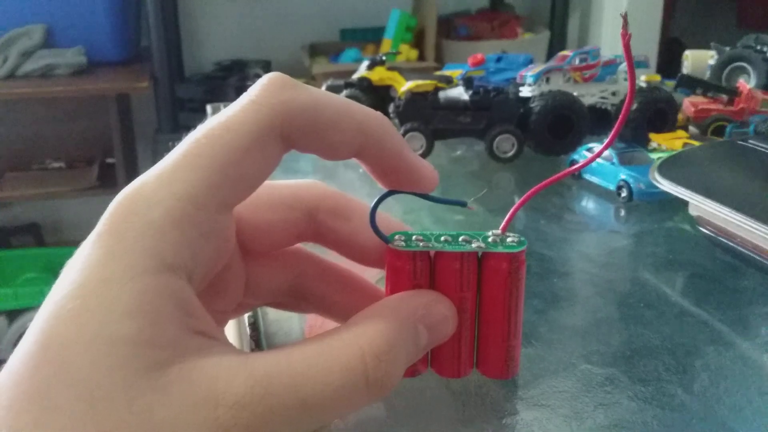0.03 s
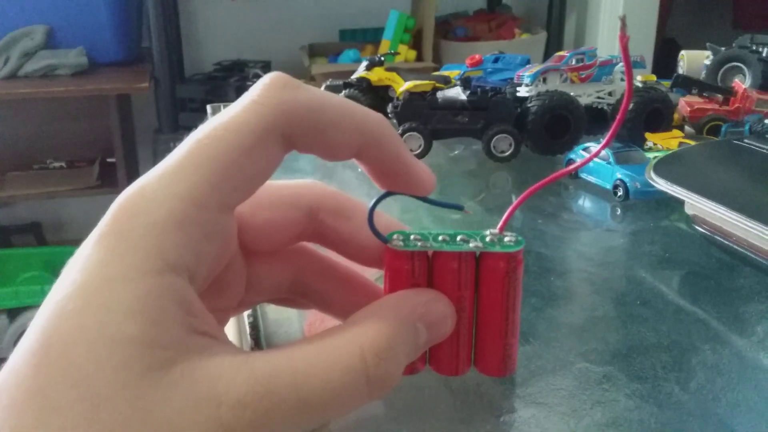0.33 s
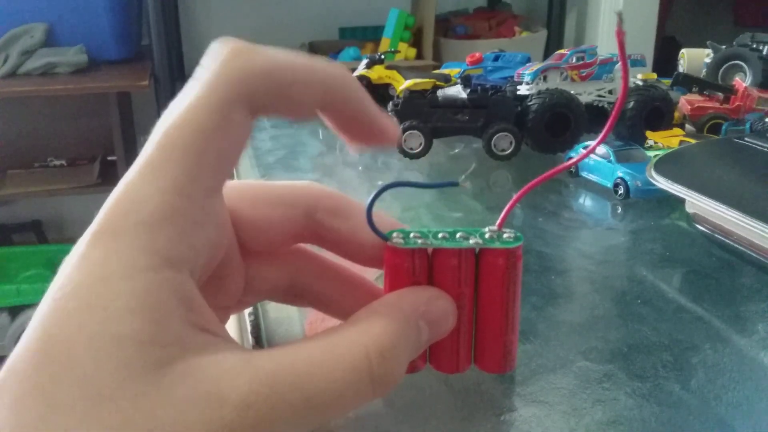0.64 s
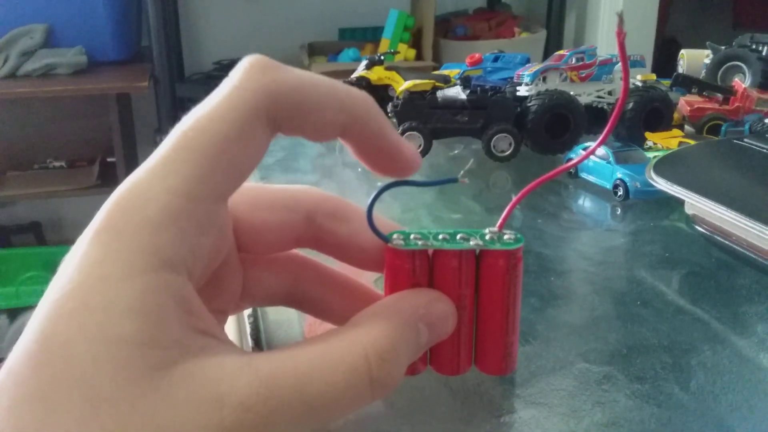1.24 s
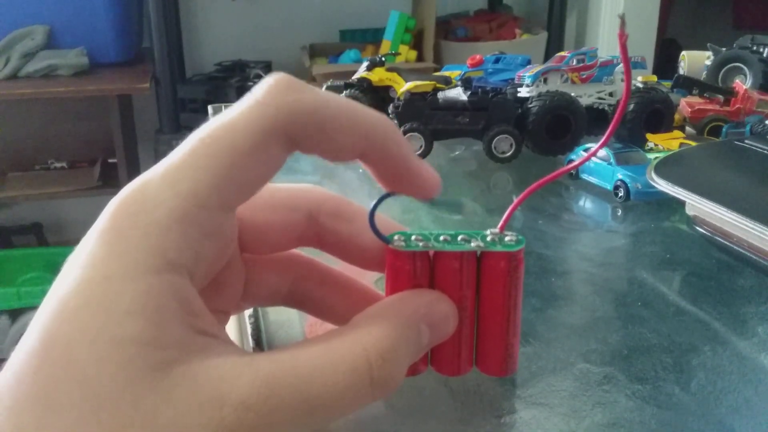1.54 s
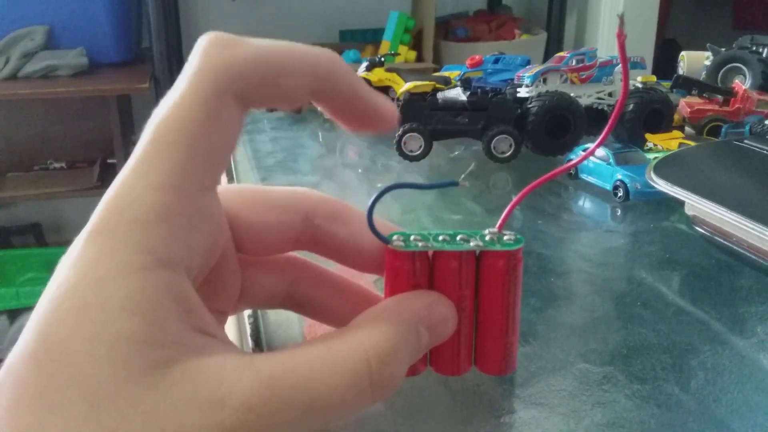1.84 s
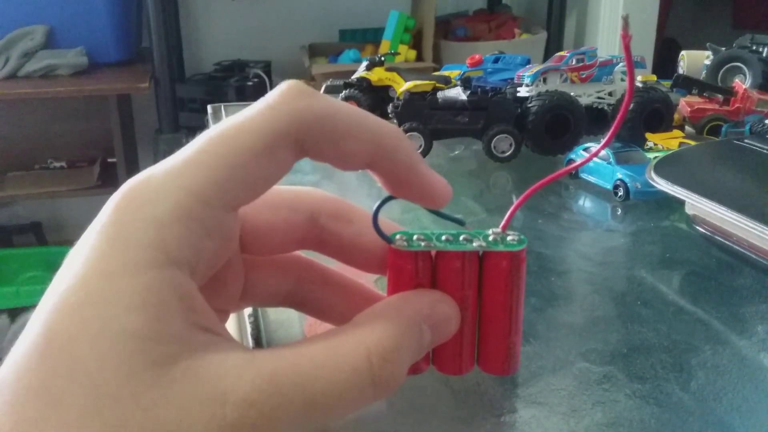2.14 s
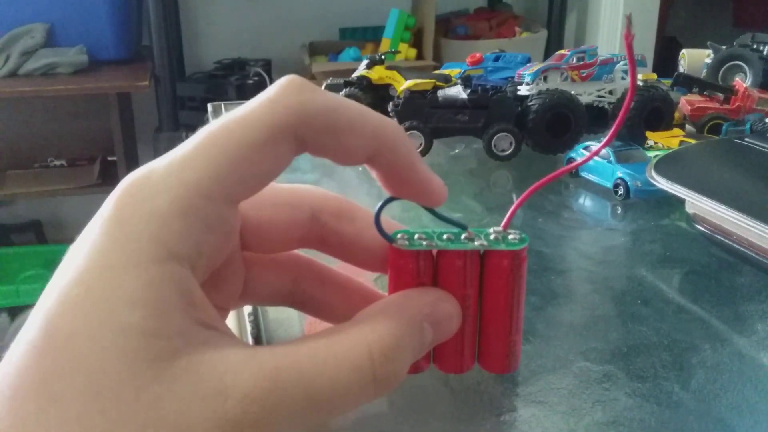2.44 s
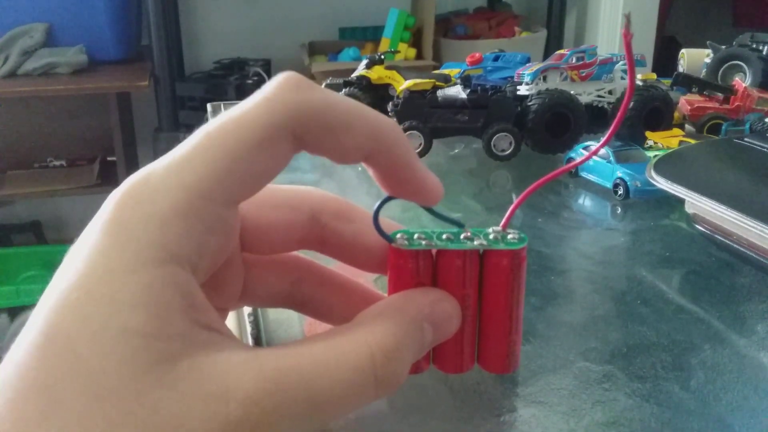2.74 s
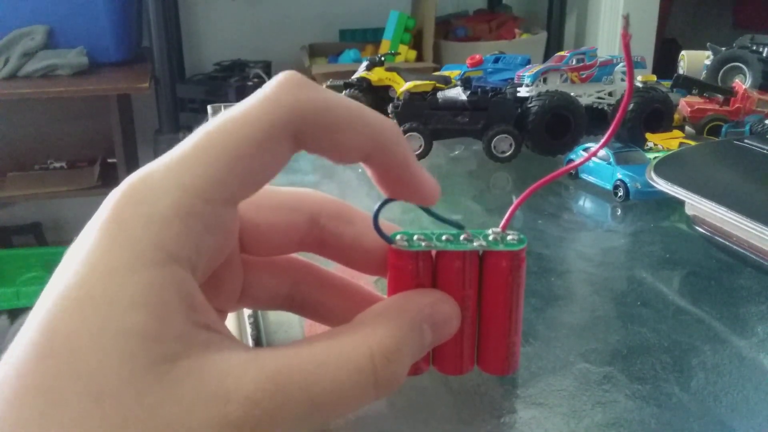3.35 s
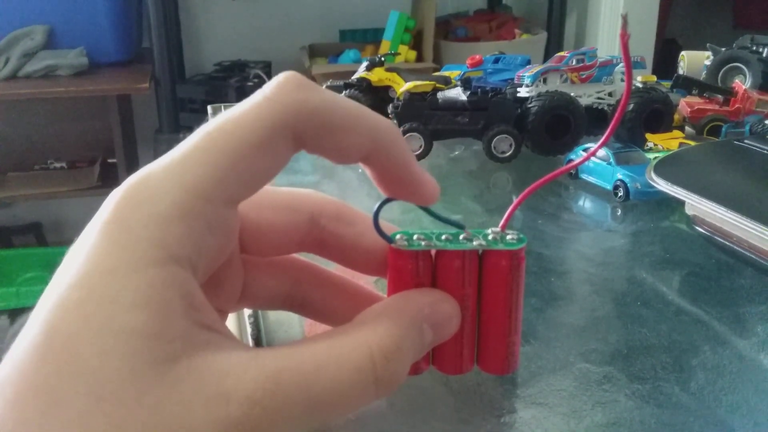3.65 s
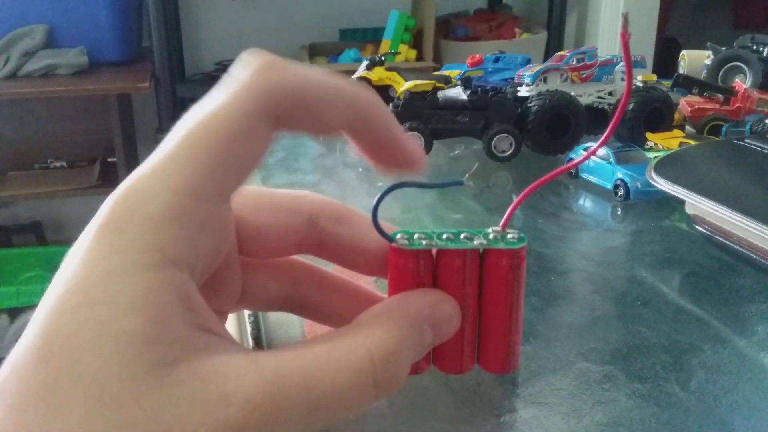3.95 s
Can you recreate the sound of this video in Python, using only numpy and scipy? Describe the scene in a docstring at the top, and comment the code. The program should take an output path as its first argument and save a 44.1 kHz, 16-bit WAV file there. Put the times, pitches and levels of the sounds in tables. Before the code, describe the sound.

Tiny electric sparks click in pairs from a tapped wire while a fan hums indoors.

```python
"""A fan runs in a small room: rushing air, wavering tones and motor hum over faint microphone hiss.
From 0.5 s a wire is tapped seven times on the contacts of a battery pack. Each tap throws two tiny
sparks, one as the wire touches and one as it lets go. Each spark is a pressure impulse, heard as a
bright snap, then its reflection off the table top, then the short hissing reverberation of the room.
After the first and second taps a finger slides off the wire with a soft brush of friction."""
import sys
import numpy as np
from scipy import signal
from scipy.fft import rfft, irfft
from scipy.io import wavfile

SR = 44100
rng = np.random.default_rng(int(sys.argv[2]) if len(sys.argv) > 2 else 0)


def transcribe(signal):
    """Save signal, clipped to [-1, 1], as a 16-bit WAV file at the path in sys.argv[1]."""
    frames = np.atleast_2d(signal).T
    limited = np.clip(frames, -1, 1)
    pcm = np.round(limited * 32767).astype(np.int16)
    wavfile.write(sys.argv[1], SR, pcm)


N = 176400


def from_db(db):
    """Amplitude ratio of a level: a factor of ten per 20 dB."""
    return 10 ** (np.asarray(db) / 20)


def at_hz(points, hz):
    """Interpolation of (f/Hz, value) points on a logarithmic frequency axis."""
    knots_hz, values = np.transpose(points)
    return np.interp(np.log(hz + 1e-3), np.log(knots_hz), values)


def noise(density):
    """Spectral shaping: white noise takes on density(f), an amplitude per root Hz."""
    hz = np.arange(N // 2 + 1) * SR / N
    return irfft(rfft(rng.standard_normal(N)) * density(hz) * np.sqrt(SR / 2), N)


def narrowband(centre_hz, width_hz):
    """Narrow-band noise of rms 1 beats into a wavering tone; centred on zero it is a slow drift."""
    x = noise(lambda hz: 1 / (1 + ((hz - centre_hz) / width_hz) ** 2))
    return x / x.std()


def add(out, x, start_s):
    """Superposition: x adds to out from start_s on."""
    i = int(np.clip(round(start_s * SR), 0, len(out) - 1))
    out[i:i + len(x)] += x[:len(out) - i]


def room_ripple_db(hz, depth_db=1.84, spacing_hz=14, corner_hz=3500):
    """Room resonances leave small peaks and dips in a steady spectrum, shallower in the treble."""
    knots = np.arange(0, SR / 2, spacing_hz)
    spread_db = depth_db / (1 + (hz / corner_hz) ** 2)
    return spread_db * np.interp(hz, knots, rng.standard_normal(len(knots)))


def fan(air_db=-76, top_hz=15800, hum_hz=120.2, hum_db=-64, flutter_hz=8):
    """Moving air gives broadband noise and wavering tones; the motor's periodic vibration gives a hum."""
    # Spectrum of the rush and the hiss floor: f/Hz, level/dB re air_db
    air_spectrum = [(20, -26.5), (35, -24), (55, -12.5), (75, -8), (95, -9.5), (145, -7), (200, -10),
                    (265, -14.5), (330, -12.5), (400, -6.5), (470, -11.5), (560, -12), (670, -9.5),
                    (750, -10.5), (830, -0.14), (920, -1.74), (980, -9), (1100, -14.5), (1220, -18),
                    (1400, -18.5), (1560, -28.5), (2000, -26.5), (2400, -33.5), (3200, -38), (5000, -43.5),
                    (8500, -46.5), (10500, -43.5), (15500, -43.5)]
    # Fan tones: f/Hz, half-width/Hz, rms level/dB before the drift
    fan_tones = [(93.3, 5.7, -67.5), (226, 6, -75.5), (301.8, 11.4, -64), (365.1, 7.3, -60.5),
                 (429.1, 10, -65.5), (500, 4.6, -70.5), (627.3, 8.3, -70), (712, 12, -78.5),
                 (782, 11, -66.5), (846.4, 10, -62.5), (907.4, 5, -61), (1018, 9.8, -71),
                 (1125, 3.2, -74.5), (1392, 10, -80), (1500, 6.9, -81), (1660, 6.9, -87.5),
                 (1816, 9.1, -83.5)]
    # Slow drift of rush and tones: t/s, level/dB
    drift = [(0, -2.5), (.35, -1), (.6, 1), (1.1, 0), (1.7, 0), (2.1, 0.36), (2.4, -1), (2.8, .5),
             (3.2, 0.9), (3.4, -1), (3.7, .5), (4, 1)]
    t = np.arange(N) / SR
    air = noise(lambda hz: from_db(air_db + at_hz(air_spectrum, hz) + room_ripple_db(hz)) * (hz < top_hz))
    tones = sum(from_db(db) * narrowband(hz, width) for hz, width, db in fan_tones)
    hum = from_db(hum_db) * np.sqrt(2) * np.sin(2 * np.pi * hum_hz * t)
    flutter_db = narrowband(0, flutter_hz)  # 1 dB rms
    level_db = np.interp(t, *np.transpose(drift)) + flutter_db
    return (air + tones) * from_db(level_db) + hum


def microphone_hiss(density_db=-123, low_hz=3120, top_hz=15800):
    """Treble self-noise, in antiphase between the two channels, sounds wide."""
    hiss = noise(lambda hz: from_db(density_db) * (hz < top_hz))
    highpass = signal.butter(4, low_hz, "high", fs=SR, output="sos")
    return signal.sosfilt(highpass, hiss) * [[1], [-1]]


def pulse(spectrum_db):
    """Minimum phase: folding the cepstrum gives the shortest causal pulse with this spectrum."""
    cepstrum = irfft(np.log(from_db(spectrum_db)))
    half = len(cepstrum) // 2
    cepstrum[1:half] *= 2
    cepstrum[half + 1:] = 0
    return irfft(np.exp(rfft(cepstrum)))


def ring(x, hz, t60):
    """A damped mode, driven by x, decays by 60 dB in t60 seconds."""
    r = from_db(-60 / (t60 * SR))
    w = 2 * np.pi * hz / SR
    return signal.lfilter([1, -r * np.cos(w)], [1, -2 * r * np.cos(w), r * r], x + 1e-18)


def sparks(body_width_hz=1070, top_hz=14500, top_width_hz=990, size=1024):
    """Each discharge radiates a pressure impulse of its own colour; some fire twice, all ring briefly."""
    # Sparks: t/s, level/dB, body f/Hz, body gain/dB, top gain/dB,
    # lead/ms of a smaller, inverted first discharge, its amplitude ratio
    discharges = [(0.485, -6.5, 6840, 4, -5, .13, 0.1), (0.5536, -14.5, 7000, -2, -4, 0, 0),
                  (1.6139, -10, 7600, -6, -2, .218, .85), (1.688, -15.5, 6640, 6, 6, 0, 0),
                  (2.425, -10, 7200, 4, 1, .62, 0.44), (2.5072, -21.5, 6800, 8, -10, 0, 0.05),
                  (2.7523, -2, 5950, -12.5, -1, 0, 0), (2.8438, -10, 6750, -17, 1, 0, 0),
                  (3.0422, -3.5, 6100, -12, 1, 0, 0.03), (3.1287, -20, 6800, -7, -2, 0, 0.02),
                  (3.3252, -10.5, 7400, 0.5, 3, 0.43, 0), (3.4053, -16.5, 7200, -8, 6, 0, 0),
                  (3.5494, -7, 7400, 1.5, 1, 0, 0.02), (3.6977, -15, 6800, 8.5, 4, 0.31, 0)]
    # Spectrum common to all snaps: f/Hz, level/dB
    snap_spectrum = [(200, -53), (2500, -30.5), (4800, -29.5), (6600, -19), (8500, -18), (9500, -16),
                     (10400, -1.5), (12000, -2), (13800, -2), (15200, -11), (16500, -18.5)]
    # Modes ringing after a snap: f/Hz, relative level/dB, T60/s
    modes = [(10400, -21.5, 0.0081), (11900, -23, .004), (13600, -32, .004)]
    snaps = np.zeros(N)
    hz = np.fft.rfftfreq(size, 1 / SR)
    top = np.exp(-.5 * ((hz - top_hz) / top_width_hz) ** 2)
    for time_s, db, body_hz, body_db, top_db, lead_ms, ratio in discharges:
        body = np.exp(-.5 * ((hz - body_hz) / body_width_hz) ** 2)
        snap = pulse(db + at_hz(snap_spectrum, hz) + body_db * body + top_db * top)
        lead_s = lead_ms / 1000
        delay = np.exp(-2j * np.pi * hz * lead_s)
        pair = irfft(rfft(snap) * (delay - ratio))
        add(snaps, pair[:size // 2], time_s - lead_s)
    return snaps + sum(from_db(db) * ring(snaps, mode_hz, t60) / 4 for mode_hz, db, t60 in modes)


def room(x, scatter_db=-15, scatter_t60_s=.012, tail_db=-11):
    """Convolution with an impulse response: direct sound, scatter off table clutter, echoes and tail."""
    # Reflections off the table, the hand and the nearest walls: delay t/ms, level/dB
    echoes = [(.4, -24), (1.25, -9.5), (1.7, -19), (7.4, -25.5), (18.1, -22)]
    response = from_db(tail_db) * reverberation()
    t = np.arange(len(response)) / SR
    scatter = rng.standard_normal(len(t)) * from_db(-60 * t / scatter_t60_s)
    response += from_db(scatter_db) * scatter / np.linalg.norm(scatter)
    response[0] += 1  # direct sound
    for ms, db in echoes:
        add(response, from_db([db]), ms / 1000)
    return signal.fftconvolve(x, response)[:N]


def reverberation(delay_s=.0051, build_s=.0058, bands=12):
    """A diffuse field builds up, then decays exponentially in each band, fastest in the top treble."""
    # Spectrum of the diffuse field: f/Hz, relative level/dB
    colour = [(3000, -4), (6500, -3), (8400, -1), (9400, 6.5), (10400, -2), (12000, -1.5), (15300, -4.5),
              (16300, -11)]
    # Reverberation time: f/Hz, T60/s
    decay_times = [(3000, 0.17), (8000, 0.18), (11000, .175), (15500, 0.14)]
    t = np.arange(SR // 2) / SR
    age = np.maximum(t - delay_s, 0)
    hz = np.fft.rfftfreq(len(t), 1 / SR)
    spectrum = rfft(rng.standard_normal(len(t))) * from_db(at_hz(colour, hz))
    centres_hz, step_hz = np.linspace(500, 17000, bands, retstep=True)
    tail = np.zeros(len(t))
    for centre in centres_hz:
        triangle = np.maximum(1 - abs(hz - centre) / step_hz, 0)
        band = irfft(spectrum * triangle, len(t))
        tail += band * from_db(-60 * age / at_hz(decay_times, centre))
    tail *= np.sqrt(1 - np.exp(-age / build_s))
    return tail / np.linalg.norm(tail)


def finger():
    """Sliding friction of skin on the wire's sleeve makes soft swells of noise."""
    # Gaussian swells: centre t/s, standard deviation/s, peak density level/dB
    rubs = [(.585, 0.0076, -110), (1.766, 0.029, -109)]
    # Friction spectrum: f/Hz, level/dB re the swell
    rub_spectrum = [(1000, -33), (2500, 5), (3500, 0), (5500, -17), (9000, -11), (10800, 7), (15000, -20)]
    t = np.arange(N) / SR
    swell = sum(from_db(db) * np.exp(-.5 * ((t - centre) / width) ** 2) for centre, width, db in rubs)
    return swell * noise(lambda hz: from_db(at_hz(rub_spectrum, hz)))


def scene():
    """Sound pressures add: the steady fan and hiss, the sparks in the room, the finger."""
    taps = room(sparks()) + finger()
    return fan() + microphone_hiss() + taps


def record(dry, start_s=.0614, fade_s=.0078, cutoff_hz=16300):
    """A linear ramp opens the sound after a moment of near silence; a low-pass filter cuts the top."""
    opening = np.clip((np.arange(N) / SR - start_s) / fade_s, from_db(-56), 1)
    lowpass = signal.ellip(10, .1, 70, cutoff_hz, fs=SR, output="sos")
    return signal.sosfilt(lowpass, dry * opening)


dry = scene()
out = record(dry)
transcribe(out)
```